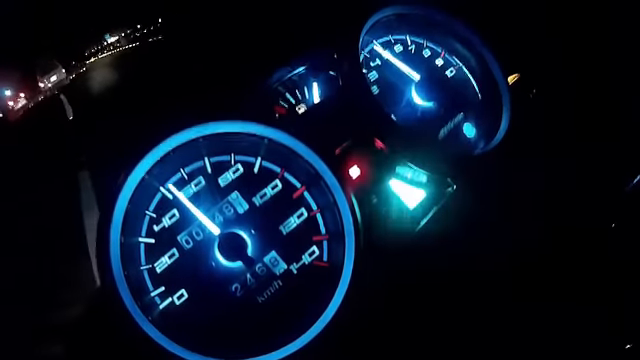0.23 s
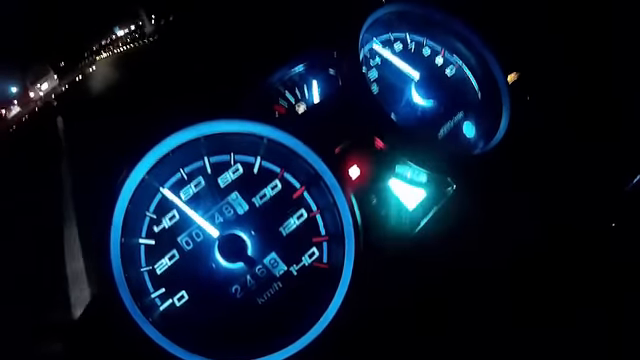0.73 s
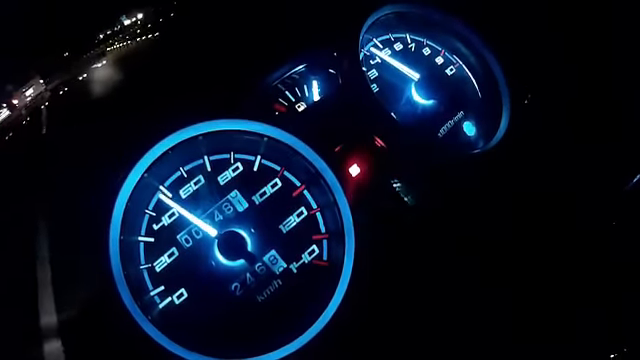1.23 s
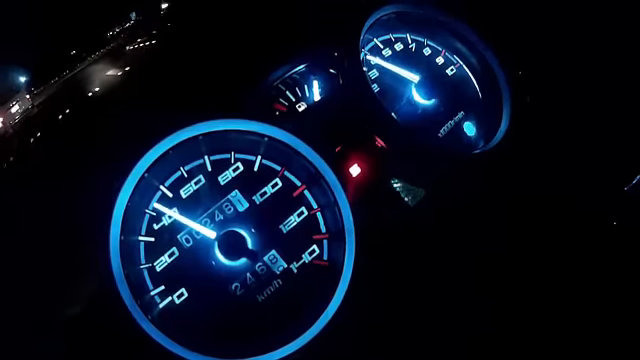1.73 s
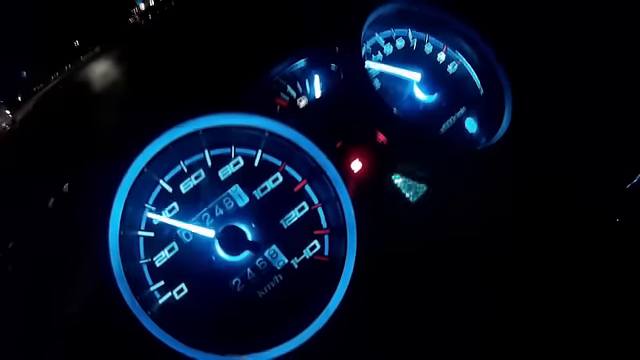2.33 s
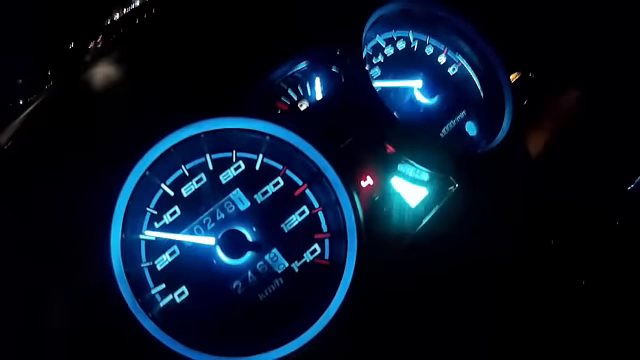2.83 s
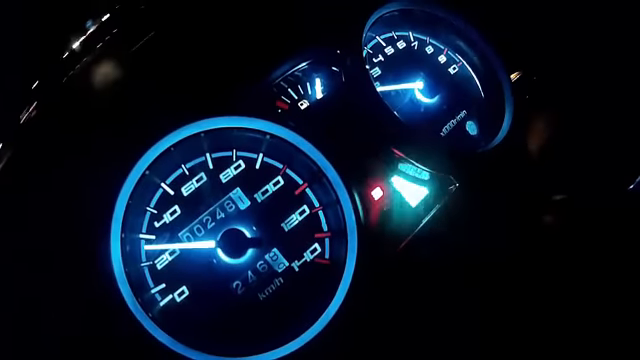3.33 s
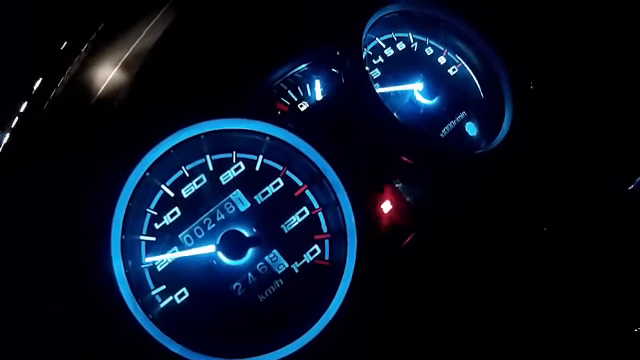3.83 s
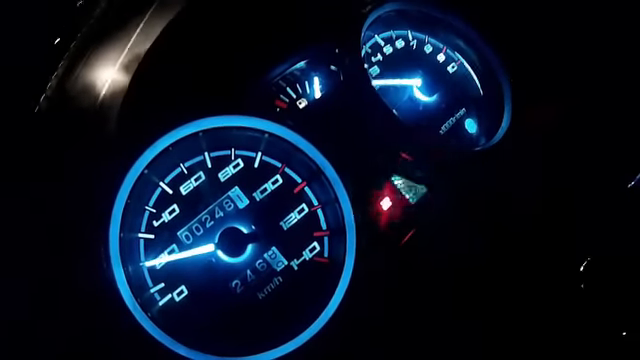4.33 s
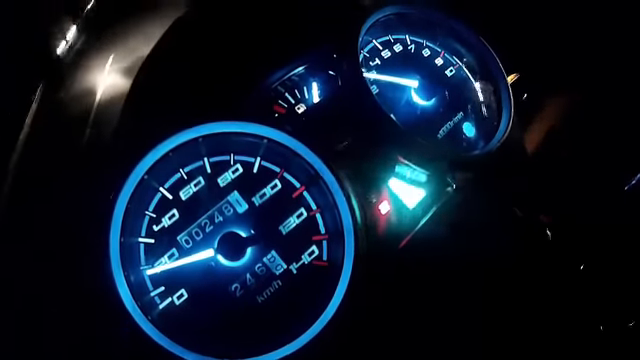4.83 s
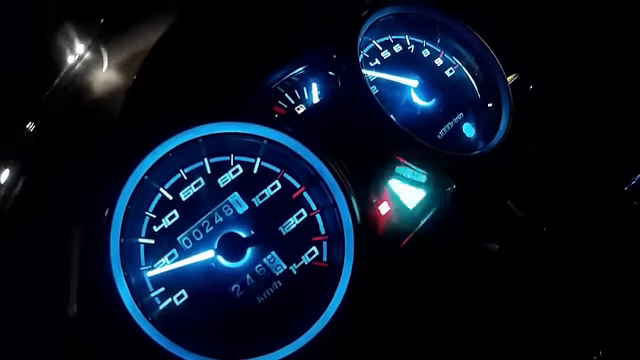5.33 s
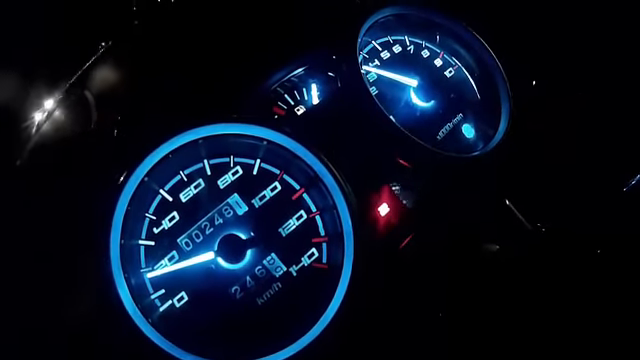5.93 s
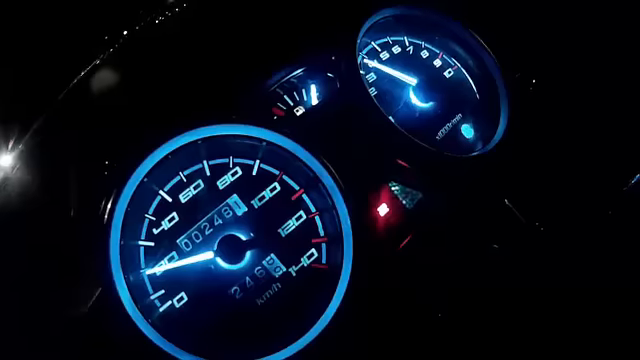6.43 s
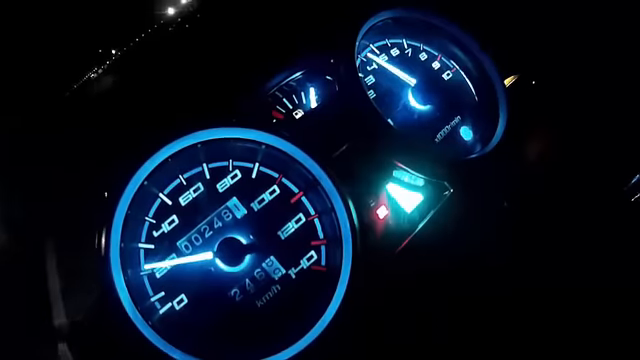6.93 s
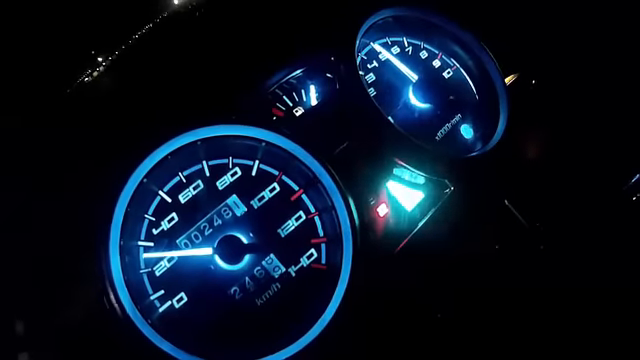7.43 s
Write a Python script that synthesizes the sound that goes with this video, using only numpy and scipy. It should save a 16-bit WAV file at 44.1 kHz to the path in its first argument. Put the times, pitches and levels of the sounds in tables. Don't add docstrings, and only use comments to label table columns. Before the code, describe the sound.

A single-cylinder motorcycle slows on engine braking, thumping and rattling, coasts down to a quiet low putter, then pulls away with rising revs and shifts up.

```python
import sys
import numpy as np
from scipy import signal
from scipy.fft import rfft, irfft, next_fast_len
from scipy.io import wavfile
from scipy.ndimage import uniform_filter1d

SR = 44100
rng = np.random.default_rng(int(sys.argv[2]) if len(sys.argv) > 2 else 0)


def boost(x):
    u = np.asarray(x, float) / 20
    return 10 ** u


def wrap_up_sound(samples):
    columns = np.atleast_2d(samples).T
    tamed = np.clip(columns, -1, 1)
    steps = np.round(tamed * 32767).astype(np.int16)
    wavfile.write(sys.argv[1], SR, steps)


N = 339570
SECONDS = np.arange(N) / SR
FREED_S = 2.11

# f/Hz, width/Hz, level/dB
FRAME_MODES = [(107, 150, -44), (170, 29.8, -3.5), (212.9, 48, 0), (238.6, 54, -6), (402, 62, -9.5),
               (470.4, 51.4, -9.5), (531.8, 69, -12)]
# f/Hz, width/Hz, level/dB
CASE_MODES = [(970, 68, -12), (1259, 77, -5), (1475, 39, -6.5), (1649, 112, 1.5), (1811, 137, -10.5),
              (1877, 73, -8)]
# f/Hz, level/dB per Hz
CRACK_COLOUR = [(1470, -34), (2500, 11), (2680, -3.5), (3100, 7.5), (5500, -7.5), (6120, -34), (7000, -13),
                (9100, -23), (15400, -120)]


def unit(x):
    return x / np.sqrt(np.mean(x ** 2))


def along(table):
    s, *columns = np.transpose(table)
    return [np.interp(SECONDS, s, c, left=c[0], right=c[-1]) for c in columns]


def colour(x, points):
    size = next_fast_len(N + SR, True) // 2 * 2
    hz, db = np.transpose(points)
    log_hz = np.log(np.fft.rfftfreq(size, 1 / SR) + 1)
    log_gain = np.interp(log_hz, np.log(hz), db) * np.log(10) / 20
    cepstrum = irfft(log_gain, size)
    cepstrum[1:size // 2] *= 2
    cepstrum[size // 2 + 1:] = 0
    return irfft(rfft(x, size) * np.exp(rfft(cepstrum)), size)[:N]


def ring(x, hz, width):
    b, a = signal.iirpeak(hz, hz / (1.173 * width), SR)
    return signal.lfilter(b, a, signal.lfilter(b, a, x))


def walk(rate):
    hold = int(SR / rate)
    steps = np.repeat(rng.standard_normal(N // hold + 1), hold)
    return 1.125 * uniform_filter1d(uniform_filter1d(steps, hold), hold)[:N]


def decay(x, seconds):
    return signal.lfilter([1], [1, -np.exp(-1 / (seconds * SR))], x)


def bump(centre_s, length_s):
    return np.exp(-((SECONDS - centre_s) / length_s) ** 2)


def effort_db(law, throttle, road):
    rest, pull, jolt = law
    return rest + pull * throttle + jolt * road


def firings(turns, scatter_db, echo_db, count):
    pipe_echo_s = .0072
    at = np.flatnonzero(np.diff(np.floor(turns)))
    late = (np.ceil(turns[at]) - turns[at]) / (turns[at + 1] - turns[at])
    charge = np.minimum(rng.standard_normal(len(at)), .9)
    size = boost(np.broadcast_to(scatter_db, N)[at] * charge)
    spikes = np.zeros(N)
    spikes[at] = size * (1 - late)
    spikes[at + 1] = size * late
    lag = int(pipe_echo_s * SR)
    return sum(boost(k * echo_db) * np.roll(spikes, k * lag) for k in range(count + 1))


def body(modes, drive, flicker_db, rate):
    total = 0
    for hz, width, db in modes:
        mode = unit(ring(drive * rng.standard_normal(N), hz, width))
        total = total + boost(db + flicker_db * walk(rate)) * np.sqrt(width) * mode
    return unit(total)


def struck_case(blows):
    rings = 0
    for hz, width, db in CASE_MODES:
        b, a = signal.iirpeak(hz, hz / width, SR)
        rings = rings + boost(db) * signal.lfilter(b, a, blows)
    return signal.sosfilt(signal.butter(10, 2020, fs=SR, output="sos"), rings)


def hum(table, waver_hz, flutter_db):
    hz, db = along(table)
    sounding = (SECONDS >= table[0][0]) & (SECONDS <= table[-1][0])
    gate = uniform_filter1d(sounding * 1., size=1024)
    tone = np.sin(2 * np.pi * np.cumsum(hz + waver_hz * walk(14)) / SR)
    return np.sqrt(2) * gate * boost(db + flutter_db * walk(15)) * tone


def wind(roar_db):
    # f/Hz, level/dB per Hz
    wind_colour = [(15, -56), (25, -5), (40, -14.5), (70, -3.5), (120, -2), (400, -12), (800, -58)]
    gusts_db = -45.0 + 0.28 * (roar_db + 46.5) + 4.0 * walk(9.1)
    return boost(gusts_db) * unit(colour(rng.standard_normal(N), wind_colour))


def road_roar(even, roar_db):
    # f/Hz, level/dB per Hz
    roar_colour = [(400, -22.5), (600, -5), (800, 0), (900, -8), (1100, -0.5), (1400, -1.5), (2000, -11),
                   (2250, -13.5), (2550, -33.5), (4000, -55)]
    swell = boost(3.2 * walk(40)) + 1.8 * decay(even, 0.0039)
    return boost(roar_db) * unit(colour(swell * rng.standard_normal(N), roar_colour))


def knocks():
    # t/s, frame thump level/dB, case rattle level/dB
    blow_table = [(0.042, -9, -28), (0.108, -3, -23), (0.356, -6, -19), (0.453, 0, -11.5), (0.641, -7, -11),
                  (0.673, -4, -21), (0.799, 0.5, -10), (0.887, 4, -15), (0.961, -14, -18), (1.03, -15, -33),
                  (1.187, 2, -32), (1.653, 0.5, -11.5), (1.711, -23, -19), (2.066, -4, -19),
                  (2.491, -9, -24), (2.549, 0, -18.5), (2.927, -33, -34), (3.293, -7.5, -21.5),
                  (3.793, -1.5, -22), (4.062, -25, -25), (4.129, -29, -33), (4.391, -9, -27),
                  (4.665, -20, -15), (4.709, 1, -8.5), (4.807, -4, -21), (4.967, -1, -12.5),
                  (5.165, -2, -14)]
    crack_below_rattle_db = -34
    s, thump_db, rattle_db = np.transpose(blow_table)
    blows = np.zeros((3, N))
    blows[:, (s * SR).astype(int)] = boost([thump_db, rattle_db, rattle_db + crack_below_rattle_db])
    thump = sum(boost(db) * ring(blows[0], hz, width) for hz, width, db in FRAME_MODES)
    rattle = struck_case(decay(blows[1], 0.0093) * rng.standard_normal(N) / 6)
    crack = colour(decay(blows[2], 0.0054) * rng.standard_normal(N), CRACK_COLOUR)
    return boost(33.0) * thump + boost(22.5) * rattle + crack


def case_buzz(low, overrun):
    slack = np.clip(-low - .14, 0, .22) ** 2
    return boost(-8.5 - 4 * overrun) * colour(slack * rng.standard_normal(N), CRACK_COLOUR)


def case_clatter(even, throttle, note_db, case_db):
    idle_throb = 0.35
    drive = boost(2.0 * walk(60)) + 2.9 * decay(even, 0.0016)
    drive = drive + idle_throb * (1 - throttle) * decay(even, 0.035)
    case = body(CASE_MODES, drive, flicker_db=1.1, rate=12)
    pull_db = np.clip(1.3 * (note_db + 28), -14, 0)
    case = case + boost(pull_db - 9) * unit(struck_case(np.roll(even, SR // 1000)))
    return boost(case_db - 1.5) * case


def frame_drone(clatter, throttle, road, roar_db):
    drone_law = (-27, 0.1, 6.6)
    loaded_db, loaded_from = -17, 0.78
    slip_s, slip_length_s, slip_db = 4.78, 0.47, 2.5
    drone_db = effort_db(drone_law, throttle, road)
    drone_db = drone_db + loaded_db * np.clip(throttle - loaded_from, 0, None)
    drone_db = drone_db + slip_db * bump(slip_s, slip_length_s)
    shake = 1 + 0.12 * decay(clatter, 0.016)
    frame = body(FRAME_MODES[:4], shake * boost(0.78 * walk(28)), flicker_db=2.5, rate=9)
    upper_db = -8.5 + 0.44 * (roar_db + 38.5)
    frame = frame + boost(upper_db) * body(FRAME_MODES[4:], shake, flicker_db=2.0, rate=11)
    return boost(drone_db) * frame


def drive_hums():
    # t/s, f/Hz, level/dB
    braking_whine = [
        (1.1, 465, -50),
        (1.25, 452.6, -49),
        (1.45, 425, -25),
        (1.7, 398.6, -37.5),
        (2.0, 364, -39.5),
    ]
    shift_boom = [
        (7.3, 250, -34),
        (7.4, 232, -23),
        (7.5, 210, -27),
        (7.58, 207, -28),
        (7.7, 242, -23),
    ]
    shift_hum = [
        (7.5, 398.6, -46),
        (7.56, 393.3, -27),
        (7.62, 421.4, -24),
        (7.7, 444, -23.5),
    ]
    shift_groan = [
        (7.5, 172.3, -27),
        (7.57, 174.5, -23),
        (7.65, 175, -19),
        (7.7, 177, -21),
    ]
    whine = hum(braking_whine, 6.0, 3.7)
    shift = hum(shift_boom, 1.8, 0.83) + hum(shift_hum, 2.73, 3.3) + hum(shift_groan, 1.98, 1.5)
    return whine + shift


def braking(turns, rate):
    braking_lines = [(2, -44, 5), (4, -29, 2.2), (5, -40, 4), (6, -30, 2), (7, -27, 2), (8, -29, 2)]
    clutch_in_s = 2.1
    mesh_db, mesh_peak_hz, mesh_width_hz, mesh_floor_db = -18, 225.7, 43.4, -35
    dip_s, dip_length_s, dip_db = 1.958, 0.049, -13
    engaged = uniform_filter1d((SECONDS < clutch_in_s) * 1., size=2048)
    lines = 0
    for k, db, loss in braking_lines:
        sinking_db = db - loss * SECONDS ** 2 / 2 * (4 + SECONDS * (k > 5))
        level = boost(sinking_db + 1.5 * walk(2.2))
        lines = lines + level * np.sin(2 * np.pi * (k * turns + rng.random()))
    detune = (9 * rate - mesh_peak_hz) / mesh_width_hz
    swell = boost(mesh_floor_db) + boost(mesh_db) / (1 + detune ** 2)
    swell = swell * boost(dip_db * bump(dip_s, dip_length_s))
    swell = swell * uniform_filter1d((SECONDS < FREED_S) * 1., size=4096)
    mesh = swell * boost(2.5 * walk(18)) * np.sin(2 * np.pi * (9 * turns + .06 * walk(10)))
    return np.sqrt(2) * (engaged * lines + mesh)


def pulling(turns, throttle):
    pulling_lines = [(8, -27), (9, -31), (11, -27), (13, -33)]
    load_db = 45 * (np.clip(throttle, 0, 1) - 1)
    lines = 0
    for k, db in pulling_lines:
        level = boost(db + load_db + 3 * walk(7))
        lines = lines + level * np.sin(2 * np.pi * (k * turns + rng.random()))
    return np.sqrt(2) * lines


def gas_crack(even, crack_db):
    puffs = .05 + decay(even ** 1.4, .0025)
    return boost(crack_db) * unit(colour(puffs * rng.standard_normal(N), CRACK_COLOUR))


def exhaust_note(turns, rate, note_db, overrun):
    # f/Hz, level/dB
    exhaust_colour = [(20, -96), (40, -62), (70, -12.5), (100, 5), (140, 3), (200, 4), (260, 1.2),
                      (330, -3), (450, -8.5), (600, -10), (900, -36.5), (1500, -51), (3000, -61)]
    overrun_db, lead_s = -7, .001
    bangs = firings(turns, 1.1, echo_db=-5, count=5)
    note = unit(colour(bangs / np.sqrt(rate), exhaust_colour))
    return boost(note_db + overrun_db * overrun) * np.roll(note, -int(lead_s * SR))


def scene():
    # t/s, firing rate/Hz
    firing_rate = [(0.0, 33.46), (0.6, 31.52), (1.0, 28.59), (1.4, 26.24), (2.05, 20.75), (2.9, 21.23),
                   (3.75, 10.66), (4.6, 20.68), (4.85, 19.09), (5.25, 20.66), (5.6, 22.04), (6.2, 27.16),
                   (7.0, 35.95), (7.2, 38.92), (7.4, 40.01), (7.55, 27.0), (7.7, 29.5)]
    # t/s, throttle 0-1, road shake 0-1
    effort = [(0, 0.69, 0.86), (.9, 0.56, 0.77), (1.5, 0.54, 0.97), (1.8, 0.63, 0.74), (2.2, 0.27, 0.33),
              (2.8, 0.16, 0.1), (3.4, 0.09, 0.09), (4.3, 0.27, 0.21), (4.55, 0.44, 0.27),
              (4.75, 0.56, 0.23), (5.1, 0.65, 0.44), (5.7, 0.76, 0.58), (6.3, .83, 0.72), (6.9, 1, 0.93),
              (7.38, 1, 1), (7.45, 0.65, .78), (7.6, 0.73, 0.79), (7.7, 0.85, .95)]
    # level at rest/dB, gain at full throttle/dB, gain at full shake/dB
    note_law = (-52.5, 37.1, 0.1)
    case_law = (-43.5, 26.6, -5.5)
    crack_law = (-99, 47.1, 9.6)
    roar_law = (-50.5, 0.1, 23.5)
    rate, = along(firing_rate)
    turns = .3 + np.cumsum(rate) / SR
    throttle, road = along(effort)
    note_db = effort_db(note_law, throttle, road)
    case_db = effort_db(case_law, throttle, road)
    crack_db = effort_db(crack_law, throttle, road)
    roar_db = effort_db(roar_law, throttle, road)
    overrun = SECONDS < FREED_S
    clatter = firings(turns, 1.8 + 3 * overrun, np.clip(rate - 36, -20, -3), count=1)
    even = clatter * np.sqrt(25 / rate)

    drive = braking(turns, rate) + drive_hums() + pulling(turns, throttle * ~overrun)
    low = exhaust_note(turns, rate, note_db, overrun) + drive + knocks()
    low = low + frame_drone(clatter, throttle, road, roar_db)
    high = case_clatter(even, throttle, note_db, case_db) + gas_crack(even, crack_db)
    high = high + case_buzz(low, overrun)
    return (low + high + road_roar(even, roar_db) + wind(roar_db))[None]


def roll_off(x):
    return signal.sosfilt(signal.butter(12, 15710, fs=SR, output="sos"), x)


def record(dry):
    camera_rate, top_hz = 32000, 15750
    own = signal.resample_poly(np.tanh(.9 * dry) / .9, 320, 441, axis=1)
    nearest = np.minimum(np.arange(N) * camera_rate // SR, own.shape[1] - 1)
    held = own[:, nearest]
    mix = signal.sosfilt(signal.ellip(10, .2, 80, top_hz, fs=SR, output="sos"), held)
    return roll_off(mix)


dry = scene()
out = record(dry)
wrap_up_sound(out)
```